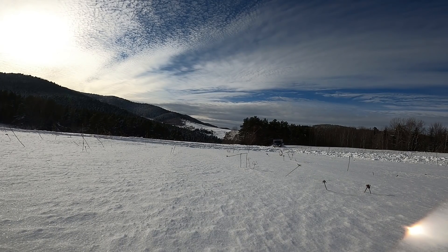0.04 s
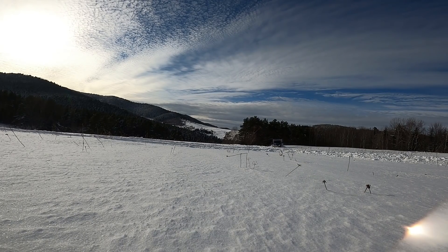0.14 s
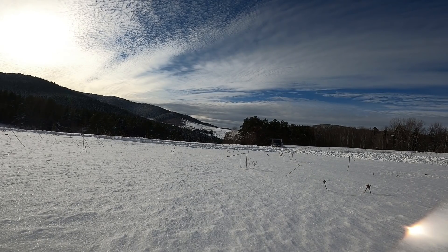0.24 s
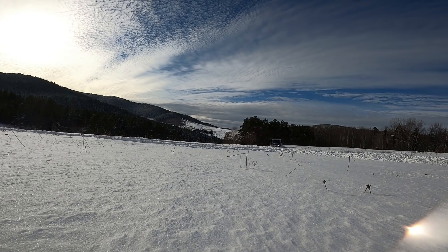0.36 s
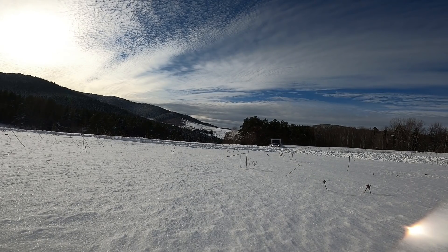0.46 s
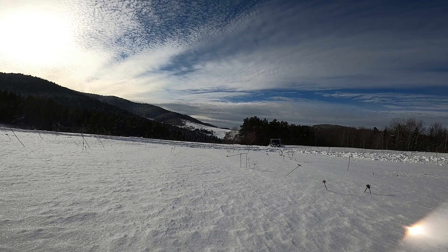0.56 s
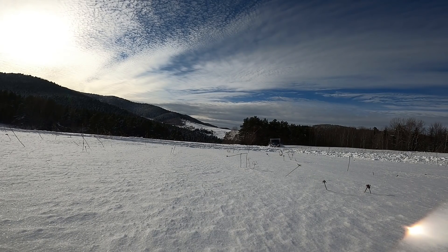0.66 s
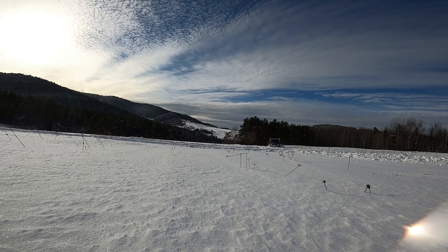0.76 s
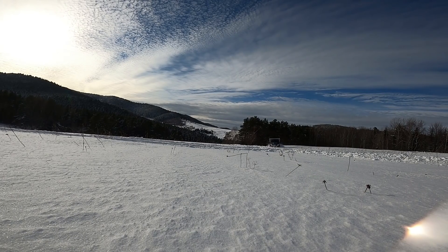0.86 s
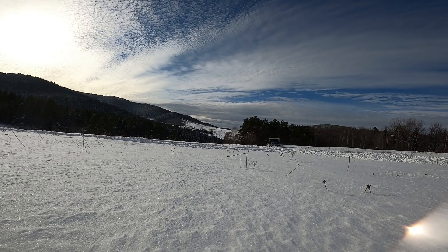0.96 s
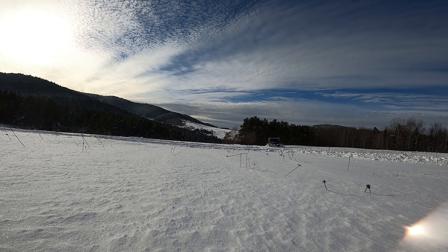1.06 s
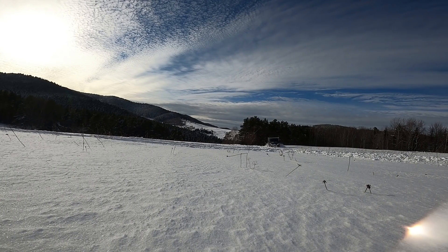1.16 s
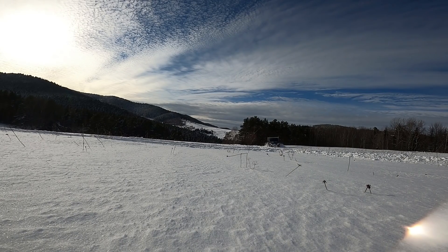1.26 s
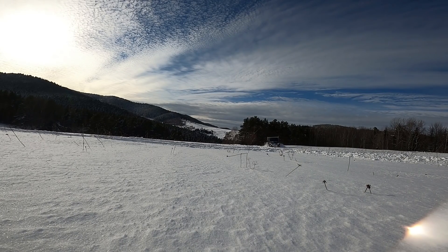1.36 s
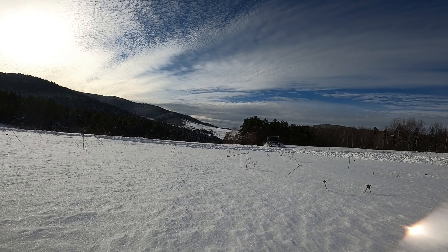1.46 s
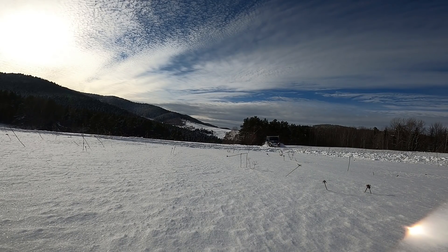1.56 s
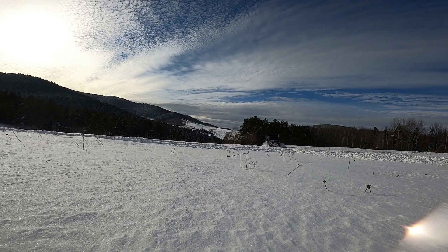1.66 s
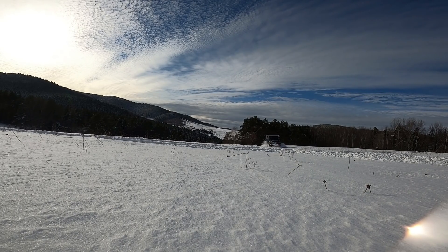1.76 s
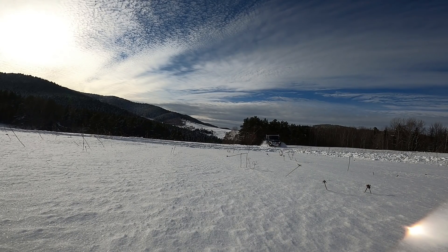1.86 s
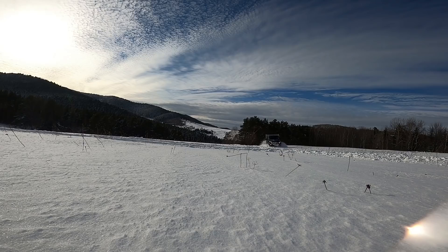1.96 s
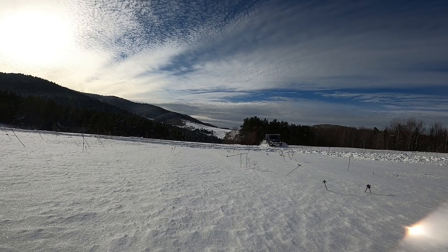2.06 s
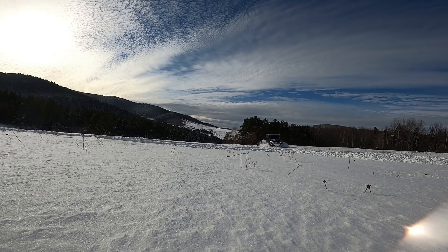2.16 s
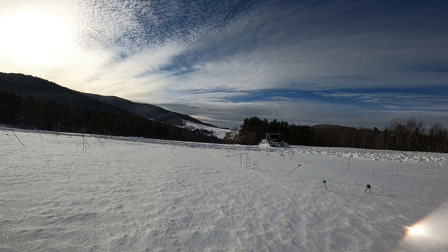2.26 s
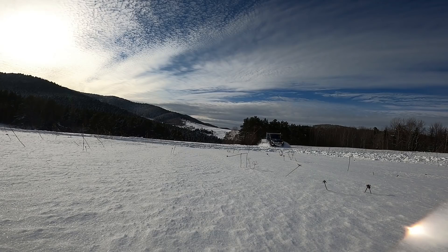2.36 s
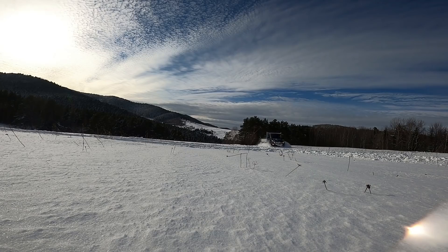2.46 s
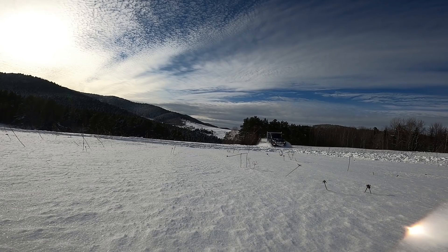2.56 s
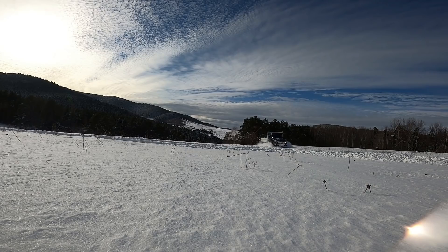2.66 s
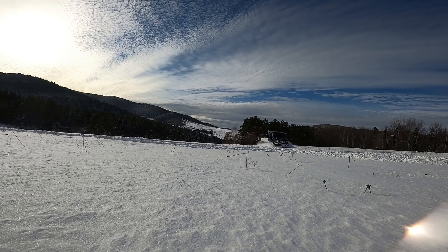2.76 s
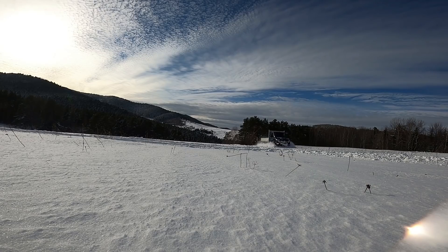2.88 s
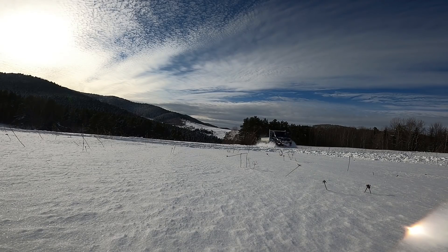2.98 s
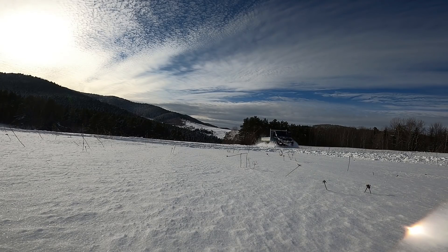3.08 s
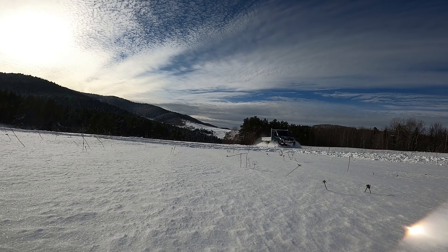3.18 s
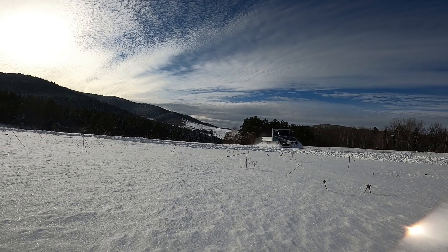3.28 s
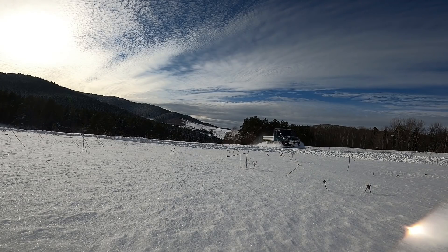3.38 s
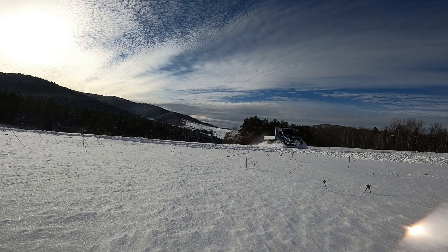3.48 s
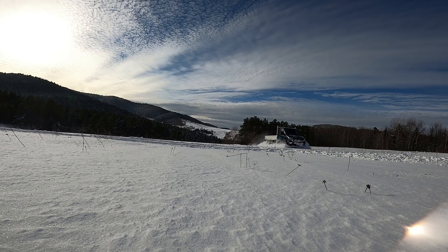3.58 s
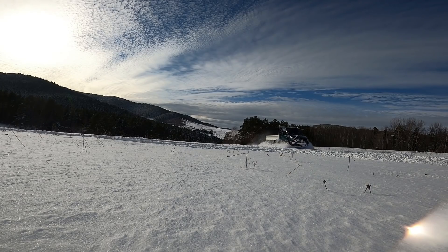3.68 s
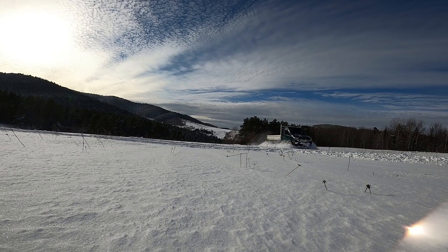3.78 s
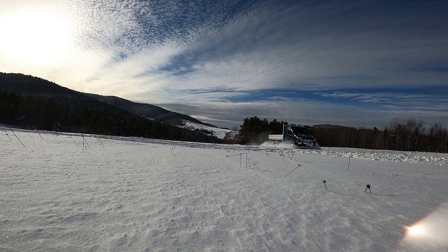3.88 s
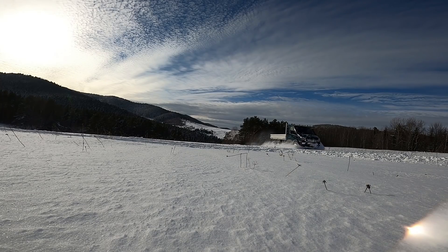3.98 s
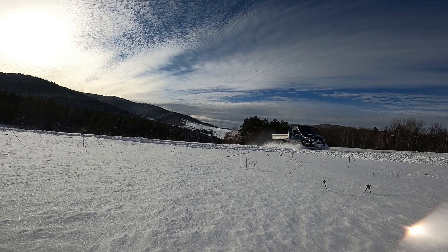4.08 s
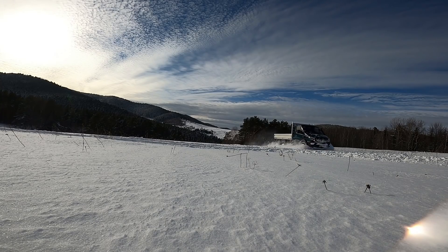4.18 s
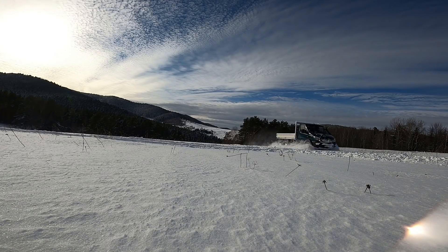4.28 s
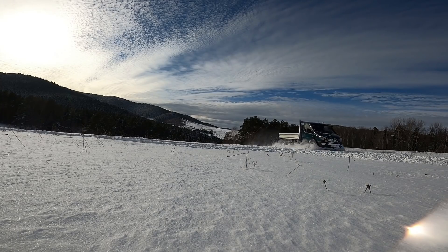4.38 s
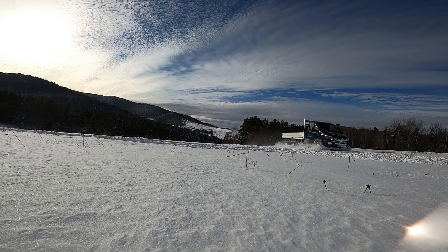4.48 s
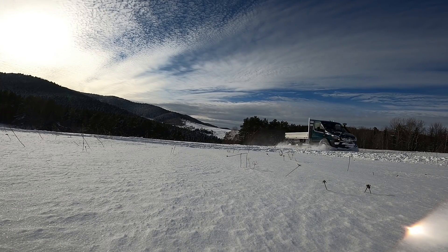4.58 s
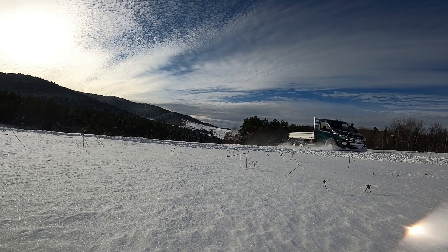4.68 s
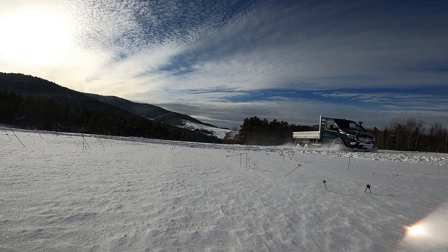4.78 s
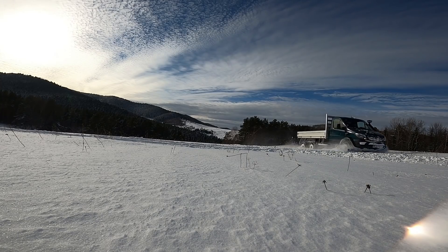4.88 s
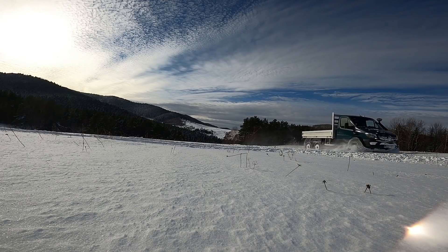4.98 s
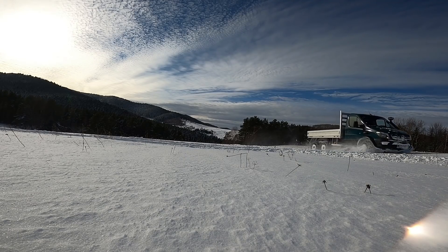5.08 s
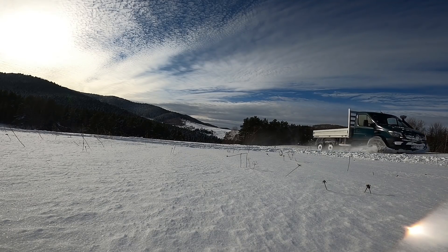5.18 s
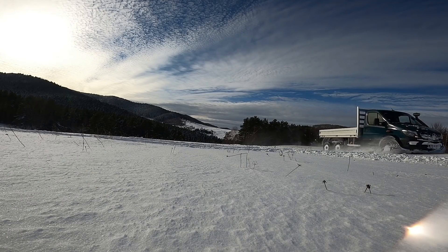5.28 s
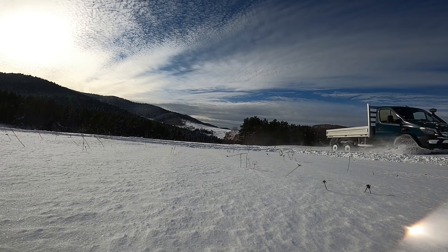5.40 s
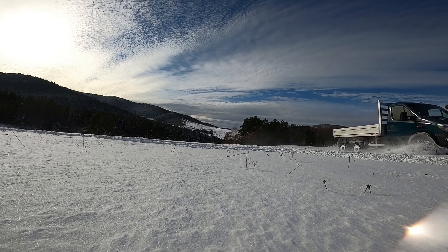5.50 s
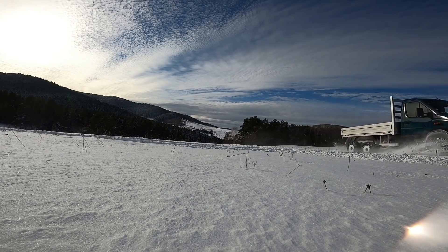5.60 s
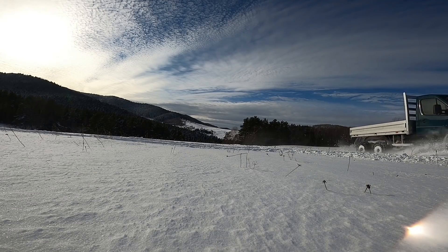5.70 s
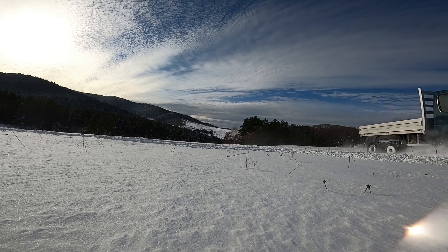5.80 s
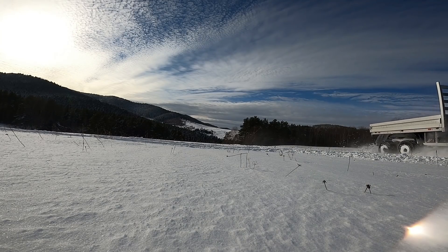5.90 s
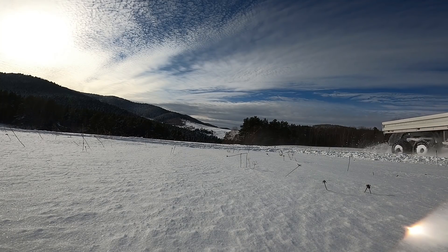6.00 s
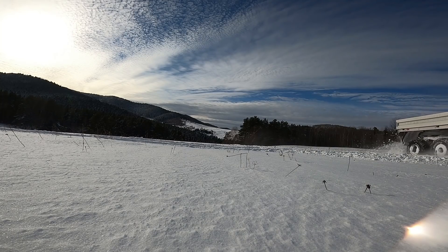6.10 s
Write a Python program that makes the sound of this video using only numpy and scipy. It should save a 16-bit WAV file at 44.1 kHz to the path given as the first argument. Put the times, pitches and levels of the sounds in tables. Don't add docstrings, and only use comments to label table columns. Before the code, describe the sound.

Outdoors in open snow, light wind brushes a stationary microphone while a distant engine drones. The drone surges and dips as the wheels spin or bite, then swells into a rough body roar with bright snow spray. Thin metallic squeaks become frequent, and hard clacks from loose fittings cluster late as the van sweeps close by. The stereo image is narrow, dry and without echo, the treble softly cut off.

```python
import sys
import numpy as np
from scipy import signal
from scipy.fft import rfft, irfft, next_fast_len
from scipy.io import wavfile
from scipy.ndimage import uniform_filter1d, map_coordinates

SR = 44100
rng = np.random.default_rng(int(sys.argv[2]) if len(sys.argv) > 2 else 0)


def invert_db(level):
    return 10 ** (np.asarray(level, dtype=float) / 20)


def store_wav(level_fs):
    pcm = np.round(np.clip(np.atleast_2d(level_fs), -1, 1) * 32767)
    wavfile.write(sys.argv[1], SR, pcm.T.astype(np.int16))


N = 271082
T = np.arange(N) / SR
FAR_M = 60


def unit(x):
    return x / np.sqrt(np.mean(x ** 2) + 1e-20)


def white():
    return rng.standard_normal(N)


def along(points, hz):
    f, v = np.transpose(points)
    return np.interp(np.log(hz + 1), np.log(f + 1), v)


def peaks(table, hz):
    return sum(invert_db(db) / (1 + (2 * (hz - c) / w) ** 2) for c, w, db in table)


def curves(rows):
    s, *cols = np.transpose(rows)
    return [np.interp(T, s, c) for c in cols]


def wobble(rate):
    coarse = T[::32]
    knots = rng.standard_normal(int(N * rate / SR) + 4)
    return np.interp(T, coarse, map_coordinates(knots, [coarse * rate]))


def lifts(rows, width_s):
    coarse = T[::16]
    swells = sum(db * np.exp(-((coarse - s) / width_s) ** 2) for s, db in rows)
    return np.interp(T, coarse, swells)


def coloured(x, gain):
    m = next_fast_len(N + 8192)
    return unit(irfft(rfft(x, m) * gain(np.fft.rfftfreq(m, 1 / SR)), m)[:N])


def shaped(x, spectrum):
    return coloured(x, lambda hz: invert_db(along(spectrum, hz)))


def ringing(x, resonances):
    return coloured(x, lambda hz: peaks(resonances, hz))


def patchy(depth_db, streak_db):
    z = signal.stft(white(), nperseg=512)[2]

    def blur(high, wide):
        field = uniform_filter1d(rng.standard_normal(z.shape), high, 0)
        return unit(uniform_filter1d(field, wide, 1))

    gain_db = depth_db * blur(10, 4) + streak_db * blur(2, 140)
    return signal.istft(z * invert_db(gain_db), nperseg=512)[1][:N]


def tone(hz, db, drift, drift_rate, flutter_db):
    turn = 2 * np.pi * np.cumsum(hz) / SR + drift * wobble(drift_rate)
    return np.sqrt(2) * invert_db(db + flutter_db * wobble(drift_rate)) * np.sin(turn)


# time in seconds, distance in m.
DISTANCE = [(0, 59.5), (.75, 55.4), (1.4, 41), (1.9, 32.3), (3.2, 19.6), (3.5, 15.7), (4.35, 11.25),
            (5.05, 9.24), (5.4, 7.04), (6.15, 4.7)]


def rise(far_db, slope):
    return far_db + slope * 20 * np.log10(FAR_M / curves(DISTANCE)[0])


# time in seconds, fourth shaft order in Hz, its level in dB under load.
ENGINE = [(0, 266, -68), (.2, 278, -59.5), (.45, 279, -60), (.56, 278, -73), (2.05, 278, -63),
          (2.3, 265, -58), (2.72, 263, -55), (2.86, 251, -59), (3.12, 259, -52.5), (3.25, 238, -58),
          (3.95, 234, -52.5), (4.12, 223, -44.5), (4.33, 231, -43.5), (4.52, 214, -45.5),
          (4.85, 221, -40.5), (5.08, 209, -46), (5.3, 222, -35), (6.15, 232, -41)]


def shaft():
    return uniform_filter1d(curves(ENGINE)[0], size=SR // 20)


def firing():
    return np.cos(np.pi * np.cumsum(shaft()) / SR)


# time in seconds, lift in dB.
LETUPS = [(.8, -17), (1.0, -1.5), (1.3, -21), (1.48, 1.5), (1.66, -22), (1.8, 6.5), (3.42, -4.5),
          (4.325, -15), (5.12, -2.5), (5.63, -2), (5.82, -5.5), (6.1, -1.5)]
# shaft order, level in dB on a scale where the firing order stands at -5.5.
SIDE_ORDERS = [(1, -9), (3, -16.5), (5, -30.5)]


def engine():
    fourth_hz = shaft()
    firing_db = rise(-71, 1.55) + 4.9 * wobble(14)
    shimmer_db = 5 * curves(DISTANCE)[0] / FAR_M * wobble(12)
    hum_db = curves(ENGINE)[1] + 1.2 + lifts(LETUPS, width_s=.05) + shimmer_db
    out = tone(fourth_hz, hum_db, drift=.6, drift_rate=18, flutter_db=1.6)
    out += tone(fourth_hz / 2, firing_db - 5.5, drift=.9, drift_rate=12, flutter_db=2)
    for order, db in SIDE_ORDERS:
        out += tone(fourth_hz * order / 4, firing_db + db, drift=.42, drift_rate=11, flutter_db=5.5)
    return out


# time in seconds, lift in dB.
LURCHES = [(.07, 5.5), (.21, -7), (.61, 3.5), (.79, -13), (.86, 3.5), (.92, -8), (1.22, 6.5), (1.77, 11),
           (1.92, 7.5), (2.05, 9), (2.19, -4), (2.33, 3), (2.43, 3.5), (2.8, 7.5), (3.04, 3.5), (3.27, -7),
           (3.5, 4), (3.72, 1.5), (4.04, 7.5), (4.6, -10), (4.88, 10), (5.06, 8), (5.19, 8), (5.45, 1.5),
           (5.575, 8.5), (5.71, 5.5), (5.76, -2.5), (5.82, 7), (6.1, 5)]
# frequency in Hz, density in dB per Hz.
RUMBLE = [(8, -33), (16, 0), (26, -6), (37, 0), (48, -2), (60, -2), (80, -13), (110, -33), (140, -56),
          (240, -120)]
# frequency in Hz, density in dB per Hz.
DRONE = [(50, -23), (75, 4.5), (120, -3), (180, -13.5), (260, -12.5), (310, -19), (360, -43), (600, -69.5)]


def rumble_and_drone():
    lurch_db = lifts(LURCHES, width_s=.029)
    rumble_db = rise(-43.5, .6) + lurch_db
    drone_db = rise(-54.5, 1.204) + .33 * lurch_db + 2.26 * wobble(6.8) - 3
    return invert_db(rumble_db) * shaped(white(), RUMBLE) + invert_db(drone_db) * shaped(white(), DRONE)


# time in seconds, lift in dB.
SURGES = [
    (3.6, -2.5),
    (5.07, 0),
    (5.2, 0.5),
    (5.29, 7),
    (5.37, 2),
    (5.82, 1.5),
]
# frequency in Hz, density in dB per Hz.
ROAR = [(200, -55), (330, -6.5), (440, -7.5), (780, -9.5), (1000, -5), (1500, -3.5), (2200, -5),
        (3500, -11.5), (6000, -26.5), (9000, -62)]
# frequency in Hz, width in Hz, level in dB over the roar.
PANELS = [(578, 100, 22), (708, 38, 13.5), (846, 28, 14.5), (978, 24, 8), (1204, 280, 3.5)]


def roar():
    roar_db = rise(-71.5, 1.657) + .7 * lifts(SURGES, width_s=.018) + .65 * wobble(18)
    panel_db = -2.5 + np.tanh((256 - shaft()) / 12)
    pulsing = patchy(depth_db=0, streak_db=-2) * (1 + .15 * firing())
    return invert_db(roar_db) * (shaped(pulsing, ROAR) + invert_db(panel_db) * ringing(white(), PANELS))


# frequency in Hz, width in Hz, level in dB.
BLOCK = [(2770, 130, 0), (3250, 70, 0), (3590, 80, 0), (4670, 150, 3.5)]


def clatter():
    return invert_db(-61.5) * ringing(white() * (1 + .34 * firing()), BLOCK)


# time in seconds, extra lag of the left port in microseconds.
BEARING = [(0, 0.5), (3, 0.71), (4.5, 9.9), (5.2, 16.9), (5.7, 22.4), (6.15, 32.5)]


def hidden_us():
    return np.maximum(curves(BEARING)[0] - 14.6, 0)


# frequency in Hz, density in dB per Hz.
SPRAY = [(300, -8), (500, -12), (900, -20), (1300, -4), (2000, -3), (2400, -5.5), (2900, 0), (4000, 0.5),
         (5000, 2.5), (5600, -2), (7000, -13.5), (9000, -34)]


def spray():
    spray_db = rise(-59.5, 1.08) + lifts(SURGES, width_s=.018) - .69 * hidden_us()
    spray_db = spray_db + 3 + .27 * wobble(9) + .45 * wobble(30)
    grains = (rng.random(N) < 300 / SR) * white() * invert_db(10)
    return invert_db(spray_db) * shaped(patchy(depth_db=.9, streak_db=.9) + grains, SPRAY)


# frequency in Hz, density in dB per Hz.
POWDER = [(4000, -50), (6000, 6.5), (7500, 0.5), (8500, -6), (11000, -13), (14000, -28), (15000, -29),
          (15500, -40), (16000, -120)]


def powder():
    powder_db = rise(-73, .78) + .2 * lifts(SURGES, width_s=.018) - .28 * hidden_us()
    powder_db = powder_db + 6.5 + .49 * wobble(34)
    return invert_db(powder_db) * shaped(patchy(depth_db=.8, streak_db=-1.6), POWDER)


# frequency in Hz, density in dB per Hz.
BREEZE = [(40, -6), (120, 0), (250, 0), (400, -12.5), (900, -33), (2000, -21), (5500, -19.5), (7000, -45),
          (9000, -56)]


def breeze():
    def puff():
        return invert_db(2.7 * wobble(6) + 1.7 * wobble(25.3)) * shaped(white(), BREEZE)

    return invert_db(-61) * np.array([puff(), puff()])


# time in seconds, peak in dB, frequency in Hz, knock in dB, rattle in dB.
SNAPS = [(0.0403, -33.5, 3800, -11, -21), (5.1824, -9, 4070, -19, -20), (5.1864, -16, 3660, -9, -32),
         (5.1897, -24, 4500, -20, -32), (5.1919, -22, 3990, -20, -35), (5.2747, -12.5, 4205, -26, -12),
         (5.278, -24, 3900, -16, -18), (5.3177, -9, 4070, -11.5, -12), (5.32, -34, 3900, 7, -30),
         (5.4407, -12, 4150, -10.5, -24), (5.6388, -6.5, 4200, -14, -19), (5.7592, -14, 4240, -10, -24),
         (5.992, -24, 3880, -30, -9), (6.109, -19, 4500, -6, -6)]


def snaps():
    strikes, rattles = np.zeros(N + SR), np.zeros(N + SR)
    t = np.arange(SR // 10) / SR
    u = t - .002
    knock = np.exp(-((u - .0004) / .00045) ** 2)
    knock = knock * np.sin(2 * np.pi * (2200 * u - 4e5 * u ** 2))
    rattle = invert_db(-60 * t / .041) * (1 - np.exp(-t / .0052))
    for s, db, hz, knock_db, rattle_db in SNAPS:
        at = round((s - .002) * SR)
        swell_s = np.where(u < 0, .00036, .00014)
        crack = np.exp(-(u / swell_s) ** 2) * np.cos(2 * np.pi * hz * u)
        strikes[at:][:len(t)] += invert_db(db) * (crack + invert_db(knock_db + 2) * knock)
        rattles[at:][:len(t)] += invert_db(db + rattle_db) * rattle
    dull = signal.sosfiltfilt(signal.butter(8, 5000, fs=SR, output="sos"), strikes[:N])
    return dull + rattles[:N] * coloured(white(), lambda hz: peaks([(3230, 7100, 0)], hz) ** 2)


# start in seconds, end in seconds, frequency in Hz,
# width in Hz, level in dB.
GLINTS = [
    (1.2, 2.397, 1990, 130, -66),
    (1.916, 3.416, 1330, 150, -60.5),
    (2.3, 3.2, 5050, 120, -65),
    (3.1, 4.503, 1780, 190, -54),
    (4.098, 5.198, 4590, 140, -47.5),
]


def glints():
    out = np.zeros(N)
    for start, end, hz, width, db in GLINTS:
        swell = np.sin(np.pi * np.clip((T - start) / (end - start), 0, 1)) ** .5
        out += invert_db(db) * swell * ringing(white(), [(hz, width, 0)])
    return out


# start in seconds, length in seconds, pitch in Hz, level in dB.
SQUEAL = [(3.25, .06, 1900, -56), (3.56, .05, 1875, -53), (3.75, .06, 1940, -57), (4.04, .09, 1890, -46),
          (4.15, .075, 1885, -46), (4.38, .11, 1880, -50), (4.515, .21, 1888, -41.5),
          (4.74, .13, 1872, -44), (4.885, .2, 1900, -39), (5.1, .085, 1897, -37.5), (5.2, .025, 1880, -44),
          (5.415, .035, 1878, -36), (5.49, .125, 1895, -42), (5.66, .06, 1895, -42),
          (5.885, .035, 1860, -38), (5.955, .05, 1900, -37.5), (6.04, .08, 1860, -39.5)]


def squeal():
    grip_s, slip_s = .008, .018
    start, length, pitch_hz, _ = np.transpose(SQUEAL)
    hz = np.interp(T, start + length / 2, pitch_hz) + 4 * wobble(14)
    rub = np.zeros(N)
    for s, length_s, _, db in SQUEAL:
        ramps = np.minimum((T - s) / grip_s, (s + length_s + slip_s - T) / slip_s)
        rub += invert_db(db) * np.clip(ramps, 0, 1)
    note = tone(hz, 0, drift=1.05, drift_rate=65, flutter_db=1.8)
    octave = tone(2 * hz, -16, drift=2, drift_rate=80, flutter_db=2)
    return rub * invert_db(2.4 * wobble(35)) * (note + octave)


# time in seconds, extra lag of the left port in microseconds.
BED_LAG = [(0, 0), (5, 2), (6.15, 10)]
# frequency in Hz, left minus right in dB.
PORT_DB = [(60, 2.7), (130, 2.6), (300, .7), (500, -1.8), (1600, -2.3), (1900, -3.5), (4500, 1.2),
           (5700, 0), (6400, -3.5), (7400, -10.5), (8500, -6), (9500, -3), (10500, -5), (13000, -3)]
# frequency in Hz, left lag in radians.
PORT_TURN = [(60, .05), (200, .38), (430, .5), (2000, .75), (3000, .95), (4000, 1.35), (5000, 2.05),
             (6000, 3.05), (6800, 3.5), (7500, 2.7), (8500, 1.9), (10000, 2.3), (12700, 3.1), (15500, 3.9)]
# frequency in Hz, level in dB.
UNSHARED = [(60, -22), (150, -21), (400, -19), (1000, -19), (3000, -14), (4000, -15), (5000, -16),
            (6000, -18), (7200, -7), (9000, -5), (11000, -2.5), (15000, 0)]
# time in seconds, lift in dB.
HAZE = [(0, 4.5), (3.1, 4), (3.6, 0), (4.3, -6), (5.8, -6), (6, 5)]


def ports(van, bed):
    hz, s, (z_van, z_bed) = signal.stft([van, bed], SR, nperseg=1024)

    def at(rows):
        return np.interp(s, *np.transpose(rows))

    z_van = z_van * invert_db(-.06 * np.outer((hz / 1e4) ** 2, at(DISTANCE)))
    shell = invert_db(along(PORT_DB, hz) / 2) * np.exp(-.5j * along(PORT_TURN, hz))

    def pair(lag_us):
        left = shell[:, None] * np.exp(-1j * np.pi * np.outer(hz, at(lag_us) * 1e-6))
        return np.array([left, 1 / left])

    chance = signal.stft(rng.standard_normal((2, N)), SR, nperseg=1024)[2]
    strength = np.sqrt(np.abs(uniform_filter1d(np.abs(z_van) ** 2, size=5, axis=1)))
    haze_db = np.outer((hz > 4500) & (hz < 6600), at(HAZE))
    private_db = along(UNSHARED, hz)[:, None] + haze_db
    private = chance / chance.std() * strength * invert_db(private_db)
    heard = (z_van + private) * pair(BEARING) + z_bed * pair(BED_LAG)
    return signal.istft(heard, SR, nperseg=1024)[1][:, :N]


def scene():
    body = rumble_and_drone() + roar() + clatter()
    van = engine() + body + spray() + powder() + glints() + squeal()
    return ports(van, snaps()) + breeze()


def low_pass(x):
    return signal.sosfilt(signal.butter(12, 15700, fs=SR, output="sos"), x)


def record(dry):
    kept = signal.sosfiltfilt(signal.cheby2(12, 50, 16200, fs=SR, output="sos"), dry)
    return low_pass(kept)


dry = scene()
out = record(dry)
store_wav(out)
```